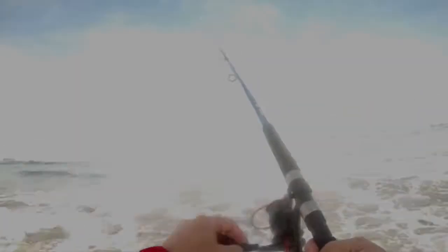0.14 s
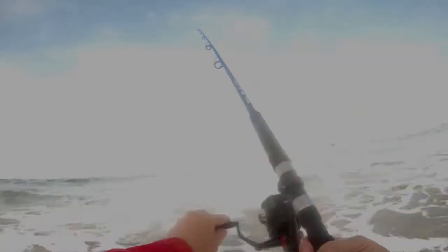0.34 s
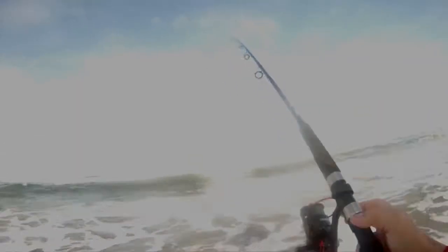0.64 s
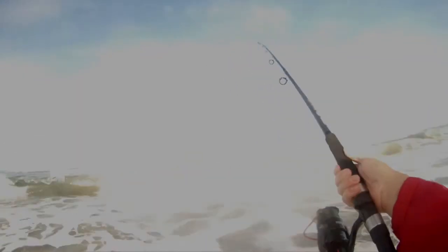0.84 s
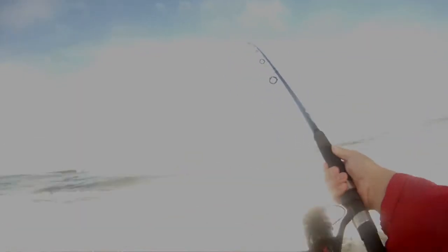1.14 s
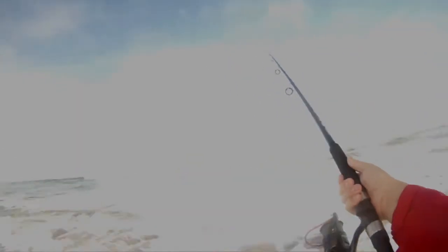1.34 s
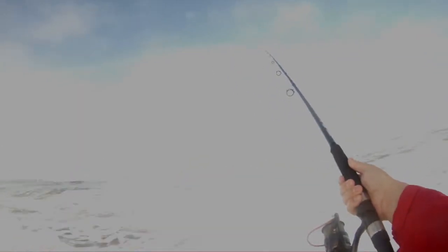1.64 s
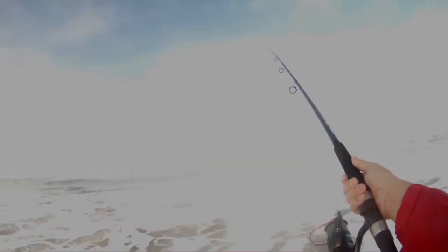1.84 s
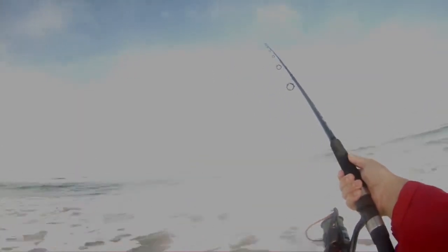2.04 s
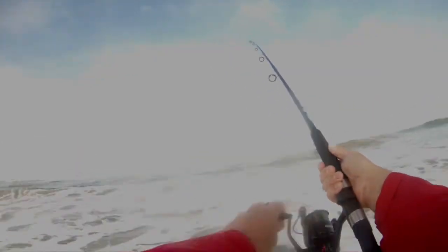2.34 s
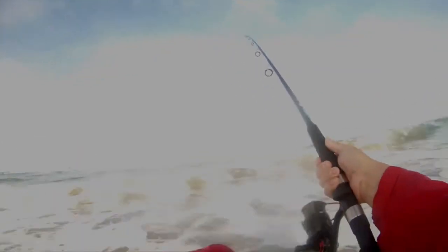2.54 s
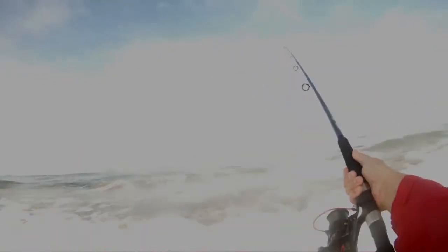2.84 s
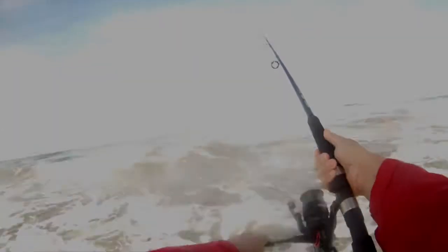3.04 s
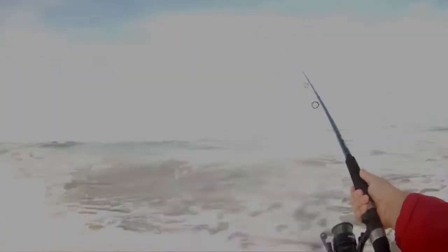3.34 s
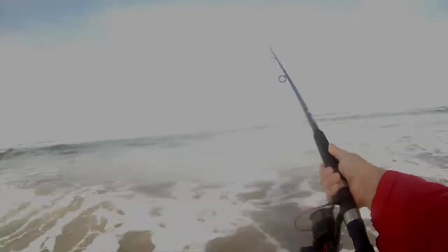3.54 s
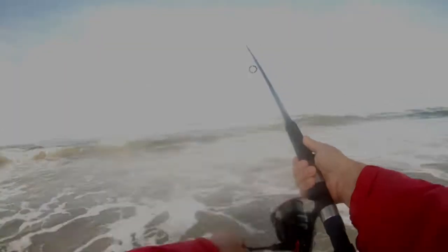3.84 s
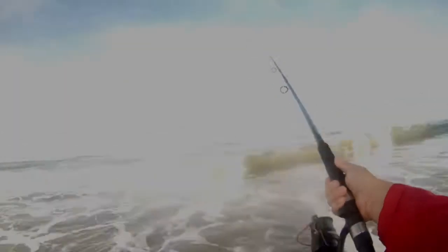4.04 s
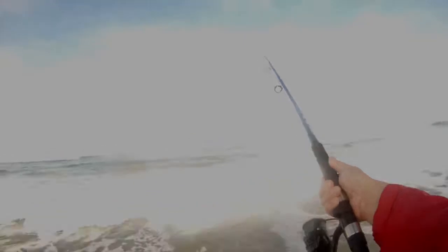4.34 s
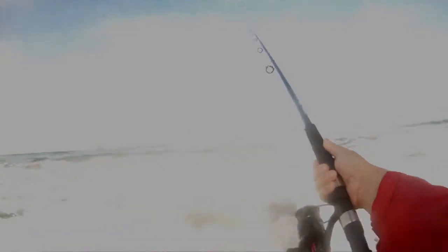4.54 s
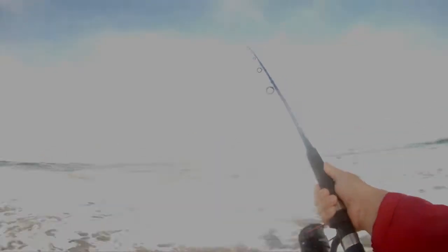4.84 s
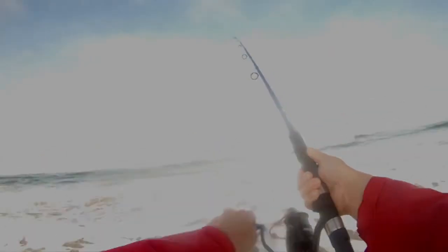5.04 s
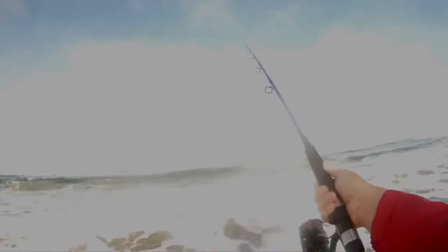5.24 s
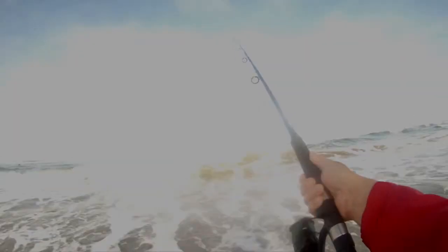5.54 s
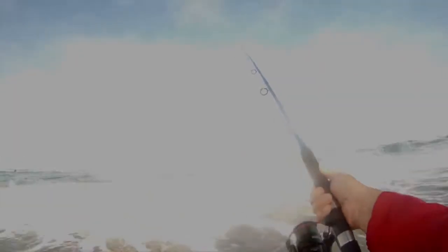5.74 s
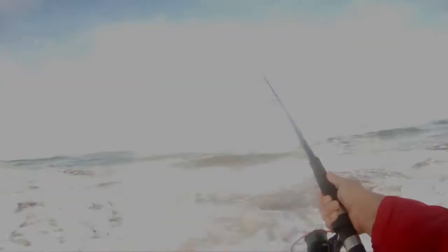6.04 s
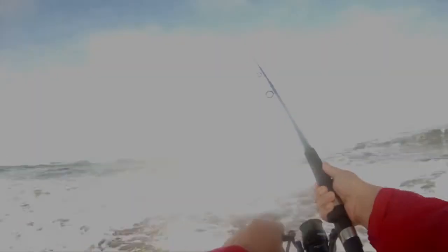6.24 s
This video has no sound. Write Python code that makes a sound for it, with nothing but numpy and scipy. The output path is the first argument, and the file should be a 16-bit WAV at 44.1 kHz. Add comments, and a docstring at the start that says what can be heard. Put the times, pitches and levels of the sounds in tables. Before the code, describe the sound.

A close wash fades at the start, a sharp tackle click follows, then a strong surge passes around one second. Quieter lapping lasts until waves return near 2.7, 4.2 and 5.7 seconds, with crisp small slaps and fizzing foam. Even distant surf hiss continues underneath. The sound is dry, open-air and centred, heard through a body-worn housing, with little low end.

```python
"""Shallow surf washes around an angler's feet: surges plunge, churn and fizz over a steady hiss farther out.
A thin sheet of water runs up ahead of a surge; both throw spray, and small crests slap close by.
Water is seething noise plus random droplets, coloured and split into churn, rush and fizz.
The tackle ticks, scrapes and bumps in filtered impulses and noise puffs.
A worn microphone hears the water through a housing that weakens one narrow band."""
import sys
import numpy as np
from scipy import signal
from scipy.fft import rfft, irfft
from scipy.io import wavfile
from scipy.ndimage import uniform_filter1d

SR = 44100
rng = np.random.default_rng(int(sys.argv[2]) if len(sys.argv) > 2 else 0)


def dump(signal):
    """Clip the signal to [-1, 1] and save it as 16-bit WAV at the path in sys.argv[1]."""
    limited = np.clip(np.atleast_2d(signal).T, -1, 1)
    pcm = np.round(limited * 32767).astype(np.int16)
    wavfile.write(sys.argv[1], SR, pcm)


N = 281341
TIME = np.arange(N) / SR
BINS = np.fft.rfftfreq(N, 1 / SR)

# colour of the near water, ahead of the housing: (frequency [Hz], relative level [dB])
WASH_COLOUR = [(30, -47), (130, -46.5), (200, -39.5), (320, -29.5), (520, -19), (1000, -11), (2000, -1.5),
               (3300, 1.5), (4800, 0), (6000, -9), (7500, -16), (9000, -15.5), (12000, -19), (16000, -23)]
# waves that pass the feet: (arrival [s], length [s], level [dB], rise time constant [s],
# fall time constant [s], sag in the middle [dB], fade over the length [dB]); negative sag or fade lifts
SURGES = [(-0.2, 0.26, -19, .1, .09, 1.5, 0.4), (0.984, 0.34, -16.5, 0.13, 0.11, 3, 1.3),
          (2.715, 0.26, -18.5, 0.082, 0.16, -1, 2.5), (3.36, 0.075, -23.5, 0.086, .1, 2.5, 2.8),
          (4.219, 0.51, -18, 0.12, 0.15, 1.1, 3), (5.681, 0.37, -18.5, 0.062, .11, 0.2, -1)]
# thin sheets of water ahead of a surge: (start [s], length [s], level [dB])
RUNUPS = [(0.502, .41, -33.5), (2.53, 0.28, -32), (3.97, 0.24, -26.5), (5.458, 0.16, -25)]


def gain_of(db):
    """Decibels to amplitude."""
    return 10 ** (np.asarray(db) / 20)


def evened(x):
    """Scales to rms 1."""
    return x / np.sqrt(np.mean(x ** 2) + 1e-20)


def colour_gain(colour):
    """Reads a colour table on a log-frequency axis, as a gain for each frequency."""
    hz, db = np.transpose(colour)
    return gain_of(np.interp(np.log(BINS + 1), np.log(hz + 1), db))


def shaped(x, gain):
    """Filters by a gain for each frequency; rms 1."""
    return evened(irfft(rfft(x) * gain, N))


def airborne(colour, notch_hz=7020, half_width_hz=520, depth=0.69):
    """Gain of a sound that enters through the housing, whose cavity weakens one narrow band."""
    notch = depth / (1 + ((BINS - notch_hz) / half_width_hz) ** 2)
    return colour_gain(colour) * (1 - notch)


def above(hz, order):
    """Share that lies above a soft crossover, for each frequency."""
    return 1 - 1 / (1 + (BINS / hz) ** order)


def seething(patch_db, flicker_db):
    """Noise with brief patches in pitch and time, and a flicker that all pitches share."""
    z = signal.stft(rng.standard_normal(N), nperseg=256, noverlap=192)[2].T  # (time, pitch)
    patches = uniform_filter1d(rng.standard_normal(z.shape), size=16, axis=0)
    patches = uniform_filter1d(patches, size=7, axis=1)
    flicker = uniform_filter1d(rng.standard_normal(len(z)), size=12)
    z = z * gain_of(patch_db * evened(patches) + flicker_db * evened(flicker)[:, None])
    return evened(signal.istft(z.T, nperseg=256, noverlap=192)[1][:N])


def droplets(per_s, spread_db):
    """Tiny impacts at random moments; a positive spread makes a few large, a negative one a few small."""
    size = gain_of(spread_db * np.minimum(rng.exponential(1, N), 5))
    hits = rng.random(N) < per_s / SR
    return evened(size * rng.choice([-1, 1], N) * hits)


def swelling(curve):
    """A level curve as a gain for every sample."""
    return gain_of(np.interp(TIME, *np.transpose(curve)))


def swell(start, length, rise, fall):
    """Gain that rises to 1 at the start, holds for the length and dies away."""
    before = np.maximum(start - TIME, 0)
    after = np.maximum(TIME - start - length, 0)
    return np.exp(-before / rise - after / fall)


def sloshing(depth_db, rate_hz):
    """Random unevenness of the flow, between 1.7 Hz and a top rate, as a gain."""
    band = above(1.7, order=4) * (1 - above(rate_hz, order=4))
    return gain_of(depth_db * shaped(rng.standard_normal(N), band))


def bursts(rows, gain, rise):
    """Puffs of coloured noise that start abruptly and die away."""
    envelope = np.zeros(N)
    for start, db, decay in rows:
        age = np.maximum(TIME - start, 0)
        envelope += gain_of(db) * (1 - np.exp(-age / rise)) * np.exp(-age / decay)
    return envelope * shaped(rng.standard_normal(N), gain)


def surge(start, length, db, rise, fall, sag_db, fade_db):
    """Gains of churn, rush and fizz as one wave passes: dark at the plunge, bright at the end."""
    churn_lag_s = 0.037  # trapped air churns just after the plunge
    progress = np.clip((TIME - start) / length, 0, 1)
    force = gain_of(db - fade_db * progress - sag_db * np.sin(np.pi * progress) ** 2)
    rush = force * swell(start, length, rise, fall)
    churn = force * swell(start + churn_lag_s, length, rise, fall)
    churn = churn * gain_of(-10 - 3.5 * progress)  # the air soon escapes
    fizz = rush * gain_of(-15.5 + 4.5 * progress ** 2)  # foam builds up towards the end
    return np.array([churn, rush, fizz])


def runup(start, length, db):
    """Gains of churn, rush and fizz for a thin, foamy sheet that arrives quickly."""
    rush = gain_of(db) * swell(start, length, rise=0.045, fall=0.076)
    return np.array([rush * gain_of(-12), rush, rush * gain_of(-12)])


def flow():
    """Gains of churn, rush and fizz at the feet: calm water, run-ups and surges add in power."""
    # water that keeps lapping between the surges: (time [s], level [dB])
    lapping_curve = [(0.008, -26.5), (0.511, -30.4), (1.701, -31.0), (2.394, -30.0), (3.68, -30.5),
                     (5.076, -28.5), (6.382, -30.4)]
    # treble fizz of the foam that lies around the feet: (time [s], level [dB])
    foam_curve = [(-0.0, -44), (0.4, -49), (1.0, -45.5), (1.601, -46), (1.891, -46), (2.272, -48.5),
                  (2.788, -40.9), (3.602, -42.3), (3.832, -43), (4.2, -46), (5.202, -43.5), (6.38, -46)]
    lapping = swelling(lapping_curve)
    calm = np.array([lapping * gain_of(-12.5), lapping, swelling(foam_curve)])
    waters = [calm] + [runup(*row) for row in RUNUPS] + [surge(*row) for row in SURGES]
    return np.sqrt(sum(gains ** 2 for gains in waters))


def wash():
    """Large air pockets churn, water rushes, and the finest bubbles fizz as the foam bursts."""
    colour = airborne(WASH_COLOUR)
    small, fine = above(1274, order=6), above(7640, order=12)  # crossovers churn/rush and rush/fizz [Hz]
    churn = shaped(seething(patch_db=1.5, flicker_db=0.9), colour * np.sqrt(1 - small))
    splashing = seething(patch_db=0.87, flicker_db=0.54) + gain_of(-6) * droplets(per_s=4000, spread_db=3.0)
    rush = shaped(splashing, colour * np.sqrt(small * (1 - fine)))
    foam = seething(patch_db=1.5, flicker_db=0.67) + gain_of(-8.5) * droplets(per_s=4400, spread_db=0.5)
    fizz = shaped(foam, colour * np.sqrt(fine))
    churn_gain, rush_gain, fizz_gain = flow()
    churn = churn * churn_gain * sloshing(depth_db=0.7, rate_hz=27)
    fizz = fizz * fizz_gain * sloshing(depth_db=0.5, rate_hz=12)
    return churn + rush * rush_gain + fizz


def spray():
    """Short sheets of fine drops, one for each surge and each run-up."""
    # colour of the drops, ahead of the housing: (frequency [Hz], relative level [dB])
    drop_colour = [(100, -50), (4000, -28), (7000, -9), (8300, 1.5), (9500, -2), (11000, -5.5),
                   (16000, -22)]
    lead_s, lag_s, half_s = 0.02, 0.025, 0.069  # half_s: from the peak down to 1/e
    # thrown just before a surge lets go, and by the front edge of a run-up
    throws = [(start + length - lead_s, db - 18) for start, length, db, *_ in SURGES]
    throws += [(start + lag_s, db - 15.5) for start, _, db in RUNUPS]
    envelope = sum(gain_of(db) * np.exp(-((TIME - peak) / half_s) ** 2) for peak, db in throws)
    drops = rng.standard_normal(N) + gain_of(-5) * droplets(per_s=4000, spread_db=-2.0)
    return envelope * shaped(drops, airborne(drop_colour))


def slaps():
    """Small crests collapse close by, as abrupt puffs of water-coloured noise."""
    # slaps ahead of a common trim: (start [s], relative level [dB], decay time constant [s])
    slap_rows = [(0.995, -10, 0.01), (2.717, -10, 0.0058), (2.911, -11, .006), (3.031, -9, 0.0054),
                 (3.345, -31, .02), (4.148, -14, .006), (5.551, -8, 0.0066), (5.655, -13, 0.027),
                 (5.708, -7, 0.0022), (5.7105, -6, .0012)]
    return gain_of(-6.5) * bursts(slap_rows, airborne(WASH_COLOUR), rise=0.00076)


def reel_clicks():
    """Sharp clicks of the reel: one coloured impulse each, with no ring."""
    # (time [s], peak level [dB])
    click_rows = [(0.6693, -9), (1.908, -30), (5.722, -24), (6.216, -21)]
    # (frequency [Hz], relative level [dB])
    click_colour = [(100, -22), (3000, -12), (5500, -6), (7500, 7), (9500, -5), (13000, -7), (16000, -8)]
    snap = np.roll(irfft(colour_gain(click_colour), N), N // 2)
    snap = snap / snap.max()
    return sum(gain_of(db) * np.roll(snap, round(s * SR) - N // 2) for s, db in click_rows)


def scrapes():
    """Short scrapes of the tackle: noise with small impacts, as surfaces catch and let go."""
    # (centre [s], level [dB], half length to 1/e [s])
    scrape_rows = [(0.546, -35.5, .004), (1.632, -38, .022), (3.347, -41, .004), (3.82, -42, .003),
                   (6.317, -39.5, .012)]
    # (frequency [Hz], relative level [dB])
    scrape_colour = [(100, -30), (3000, -14), (5500, -9), (7200, 5), (8500, -7), (11000, -18), (16000, -13)]
    touch = sum(gain_of(db) * np.exp(-((TIME - s) / half) ** 2) for s, db, half in scrape_rows)
    slips = rng.standard_normal(N) + gain_of(-12) * droplets(per_s=1700, spread_db=-1.0)
    return touch * shaped(slips, colour_gain(scrape_colour))


def rod_bumps():
    """Soft bumps of the rod against the body: dull puffs of noise."""
    # (start [s], level ahead of the rise [dB], decay time constant [s])
    bump_rows = [(0.665, -47, .02), (0.715, -51, .025), (0.935, -46.5, 0.13), (3.172, -45, 0.012),
                 (4.203, -42, 0.027), (5.66, -45.5, 0.05)]
    # (frequency [Hz], relative level [dB])
    bump_colour = [(30, -30), (120, -15), (230, 4), (450, 13), (900, -13), (3000, -45)]
    return bursts(bump_rows, colour_gain(bump_colour), rise=0.0027)


def tackle():
    """Clicks, scrapes and dull bumps reach the housing by contact, past its notch."""
    return reel_clicks() + scrapes() + rod_bumps()


def breakers():
    """Far white water: countless bubbles merge into an even hiss."""
    # colour of the far water, ahead of the housing: (frequency [Hz], relative level [dB])
    far_colour = [(30, -47), (120, -40.5), (200, -31.5), (320, -20.5), (520, -12.5), (1000, -3.5),
                  (2000, -0.5), (3200, 0), (4800, -8), (6000, -11.5), (7500, -17.5), (9000, -24),
                  (12000, -21), (16000, -23)]
    return gain_of(-34) * shaped(seething(patch_db=0.6, flicker_db=0.0), airborne(far_colour))


def dulled(water):
    """The highest treble of the water dips for a moment, twice, then returns."""
    # (start [s], length [s], depth [0-1])
    dull_rows = [(2.14, .25, .4), (3.76, .13, 0.55)]
    edge_s = 0.045
    dip = sum(depth * swell(start, length, edge_s, edge_s) for start, length, depth in dull_rows)
    treble = irfft(rfft(water) * above(11000, order=12), N)
    return water - dip * treble


def scene():
    """One microphone feeds both channels."""
    mono = dulled(wash() + breakers()) + spray() + slaps() + tackle()
    return np.array([mono, mono])


def record(dry):
    """The recorder's band limit: a steep low-pass."""
    edge_hz = 15900
    lowpass = signal.firwin(511, edge_hz, window=("kaiser", 9), fs=SR)
    return signal.oaconvolve(dry, lowpass[None], "same")


dry = scene()
out = record(dry)
dump(out)
```